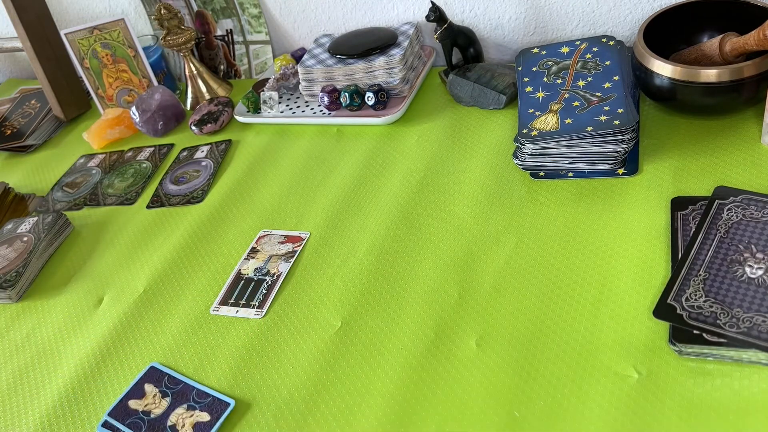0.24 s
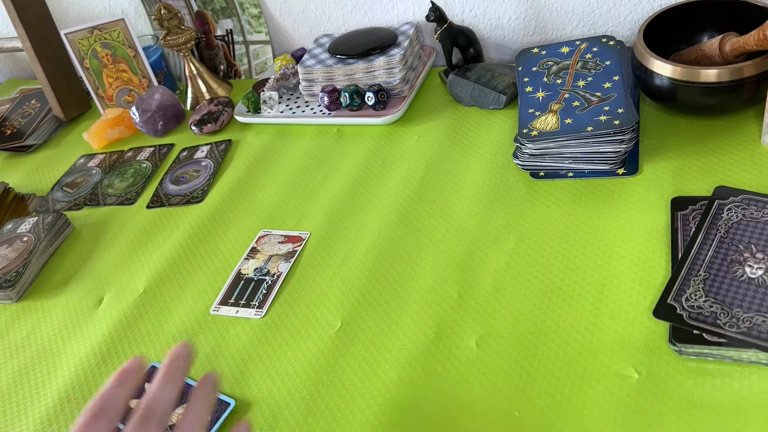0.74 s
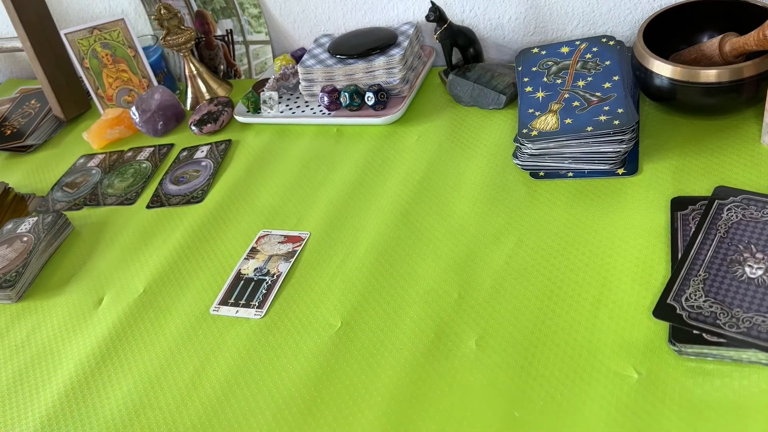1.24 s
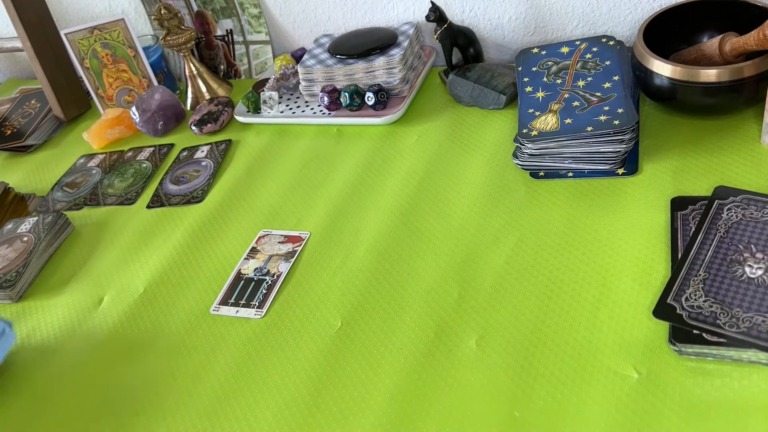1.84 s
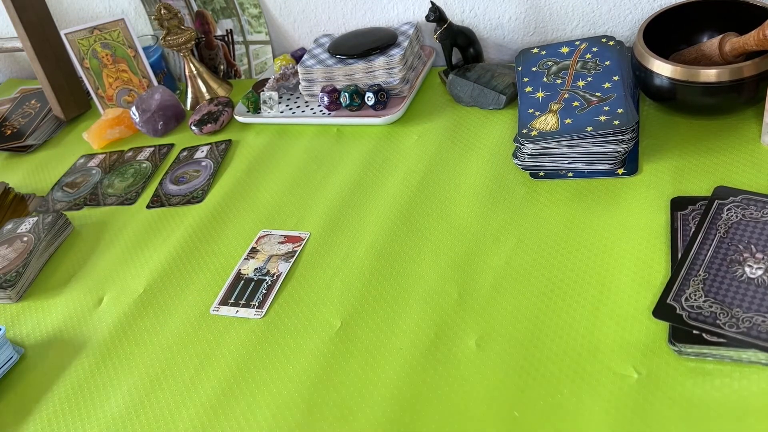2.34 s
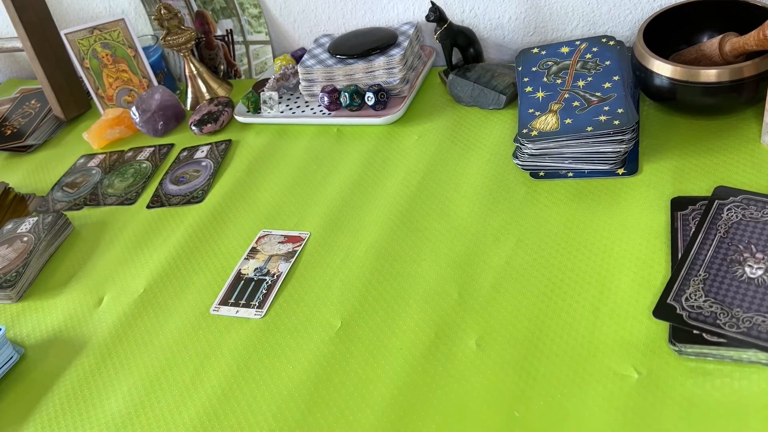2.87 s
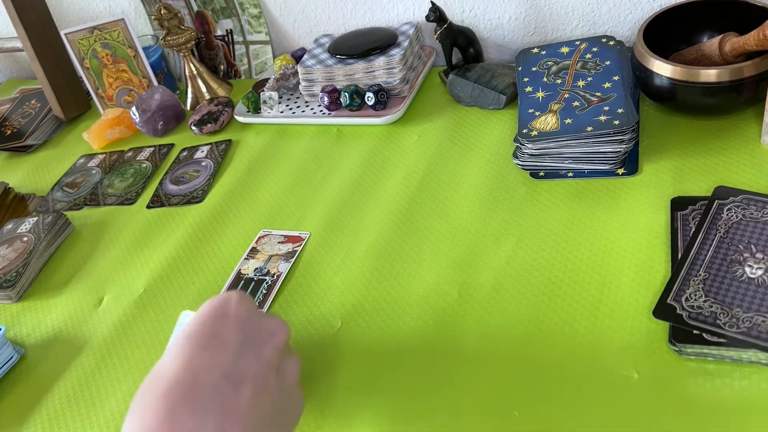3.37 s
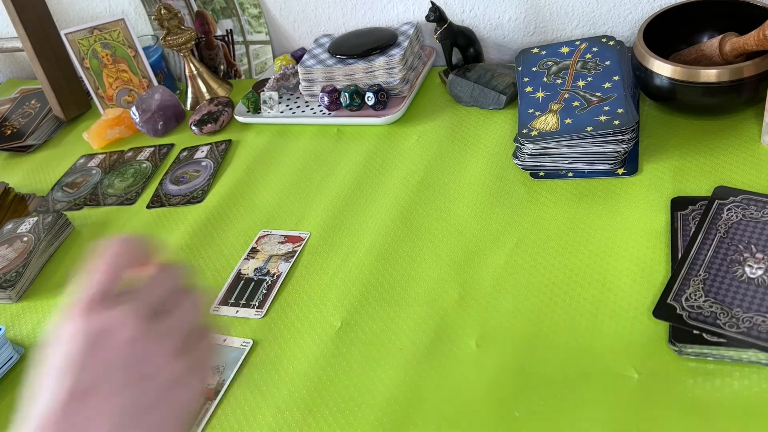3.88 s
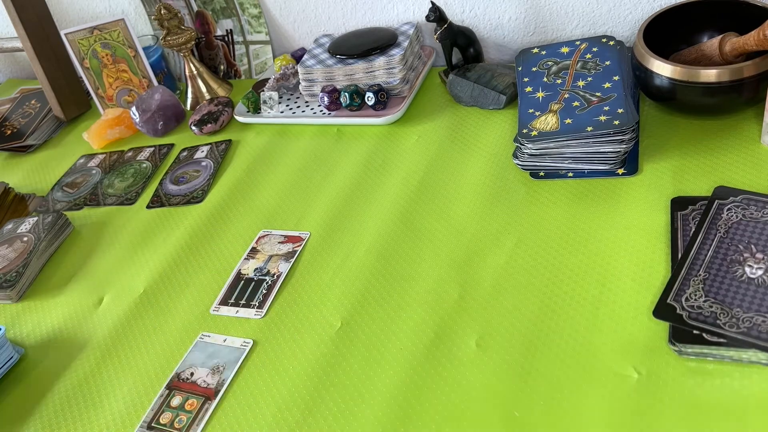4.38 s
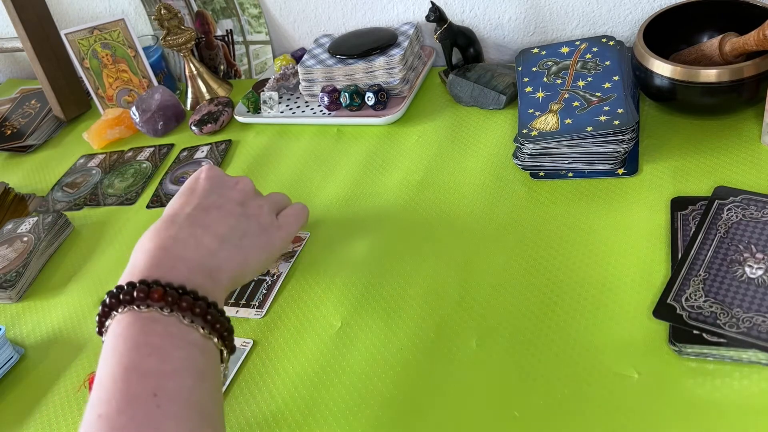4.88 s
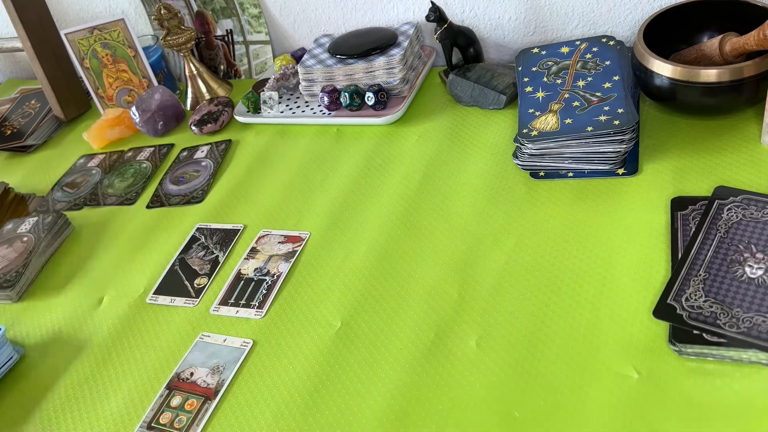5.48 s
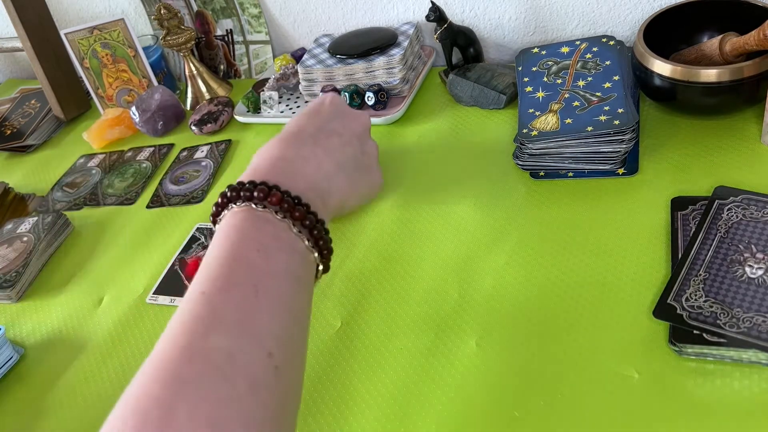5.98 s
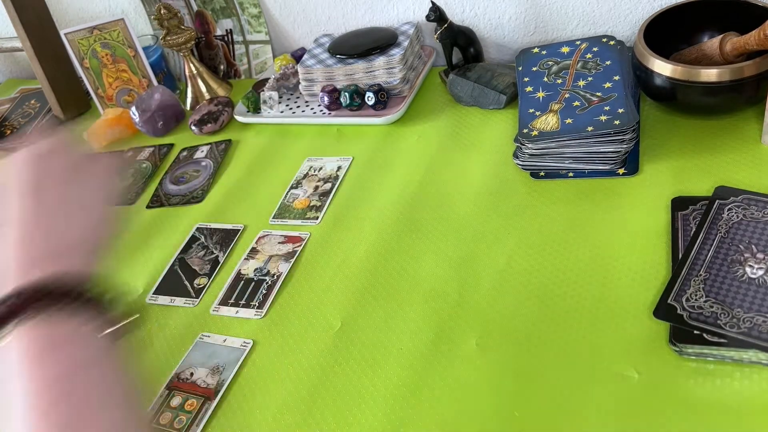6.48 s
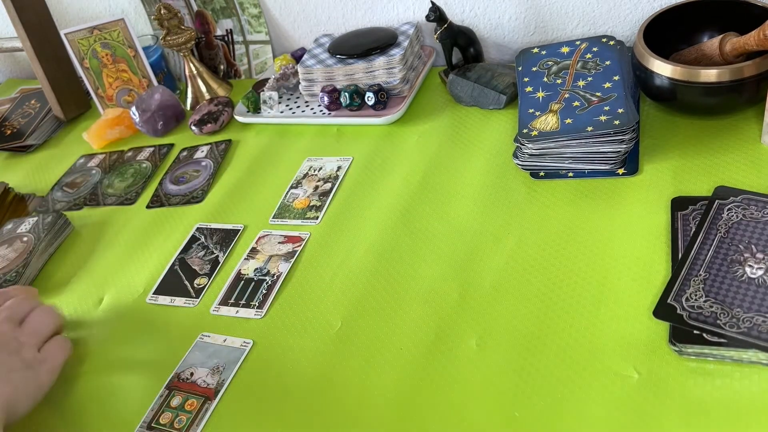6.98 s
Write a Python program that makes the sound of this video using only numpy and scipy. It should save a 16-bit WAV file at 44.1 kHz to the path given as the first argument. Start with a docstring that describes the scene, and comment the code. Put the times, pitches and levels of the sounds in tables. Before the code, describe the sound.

Stiff cards snap and tap onto a thin mat over a wooden table, with papery rubs between, over a faint low hum.

```python
"""Stiff cards on a thin mat

Small stiff cards are squared, slid off a deck and snapped down on a thin mat over a wooden table, close up.
Each contact is a burst of uneven clicks that rings the card, crackles at its edge and knocks the table modes.
Between contacts, shaped noise rubs, scuffs, whistles and drags in strokes; dense reflections trail the
contacts and drags. Soft noise and hum lie underneath, and the recorder's gain sinks after loud snaps."""
import sys
import numpy as np
from scipy import signal
from scipy.fft import rfft, irfft, next_fast_len
from scipy.io import wavfile
from scipy.ndimage import uniform_filter1d

SR = 44100
rng = np.random.default_rng(int(sys.argv[2]) if len(sys.argv) > 2 else 0)


def to_wav(s):
    """Save 16-bit WAV."""
    ch = np.atleast_2d(s).T  # columns
    pcm = np.round(np.clip(ch, -1, 1) * 32767)  # PCM
    wavfile.write(sys.argv[1], SR, pcm.astype(np.int16))


N = 318402

# All levels are ahead of the recorder's gain control.
# Soft room noise. Each row: frequency in Hz, relative density in dB per Hz.
ROOM_TONE_SPECTRUM = [(25, -23), (50, 3.5), (160, -1), (430, -6.5), (620, -14), (800, -13), (1370, -18.5),
                      (1800, -13.5), (2500, -20), (3600, -23.5), (4600, -36.5), (9900, -40.5), (11600, -34),
                      (16000, -49)]
ROOM_TONE_DB = -56
# Wavering hum lines. Each row: frequency in Hz, width of each filter pass in Hz, level in dB.
HUM_LINES = [(76.5, 19, -69), (114.2, 41, -61.5), (158.75, 4.4, -62), (223.8, 4, -72)]
STEADY_HZ, STEADY_DB = 159.1, -59.5   # the steadier core of the hum

# Card contacts. Each row: start in seconds, peak of the card's ring and slap in dB, card ring in Hz,
# edge crackle in dB re that peak, knock into the table in dB re that peak, frequency that the knock
# favours in Hz, contact length in seconds.
CARD_TAPS = [(0.01, -45.5, 3200, -2, -15, 700, 0.0027), (.023, -32, 2880, -20, -2, 700, 0.0072),
             (0.035, -35.5, 2800, -24, 10, 206, 0.0038), (0.13, -20, 2700, -7.5, -2, 900, 0.0034),
             (0.1336, -20, 4970, -19, 6.5, 910, 0.0026), (.138, -24.5, 4200, -10, 8, 1200, 0.0034),
             (0.184, -34, 3800, -7, -8, 690, 0.0027), (0.194, -35, 4530, -8, 9, 302, 0.0035),
             (0.399, -52.5, 5020, 3, -5, 390, 0.0018), (0.443, -41.5, 1120, -0.5, 2, 397, 0.0053),
             (0.542, -40.5, 2650, -11, 1, 357, 0.0084), (0.92, -41.5, 5000, -3, -15, 1290, 0.0023),
             (0.943, -60, 9050, 2, -13, 780, 0.0015), (1.354, -43, 6000, -12, 5, 406, 0.0026),
             (1.499, -45, 3214, -3, 1, 1070, 0.0042), (1.552, -53, 5120, 10, -8, 750, 0.004),
             (1.654, -40, 1130, 2.5, 13.5, 1110, .0042), (1.797, -47, 1410, 1, 24.5, 880, 0.0019),
             (1.799, -23.5, 3640, -1.5, -7, 268, 0.0026), (1.809, -38, 3280, -19, 0, 460, 0.0043),
             (1.895, -37.5, 4150, -6, 2, 430, 0.013), (2.001, -32, 1440, -8, 1.5, 140, 0.0019),
             (2.003, -35, 3600, -8, -6, 302, 0.0045), (2.009, -41, 900, -10, 9, 400, 0.0032),
             (2.026, -40, 2800, -1, 7, 700, 0.0048), (2.017, -38, 3370, 0, 10, 700, 0.00406),
             (2.055, -33, 3600, -0.5, -11, 312, 0.0077), (2.068, -32, 1680, -15, -7, 700, 0.0042),
             (2.063, -26.5, 4440, -2, -12, 316, 0.0056), (2.182, -57, 6030, 10, -9, 395, 0.0022),
             (2.378, -31.5, 3200, -3.5, -11, 760, 0.0045), (2.392, -31.5, 2840, -18, -11, 780, 0.0017),
             (2.631, -39, 3820, 3, -6, 316, 0.018), (2.741, -28.5, 7800, -10, -17, 365, 0.016),
             (3.119, -45, 3500, -9, -17, 420, 0.004), (3.139, -45.5, 1610, -15, -8, 424, 0.005),
             (3.147, -39.5, 2770, -12, -16, 420, 0.0024), (3.304, -48, 2470, -27, -20, 420, 0.0075),
             (3.368, -38.5, 2460, -1, 5.5, 900, 0.0024), (3.5197, -38, 6300, -21, 12.5, 390, 0.0023),
             (3.665, -43.5, 3150, -7, 4, 220, 0.0037), (3.7755, -26.5, 4440, -8, -17, 700, 0.0034),
             (3.799, -30, 3530, 1.5, 15, 398, 0.0036), (3.9048, -39, 7300, 13, -8, 205, 0.0019),
             (3.912, -53, 5380, 13, -12, 230, 0.0029), (4.134, -38.5, 1180, -0.5, -23, 200, 0.00094),
             (4.1642, -34, 4000, -8, 6, 1300, 0.0015), (4.28, -48, 3000, 1, -14, 400, .005),
             (4.315, -43, 2820, -16, -9, 945, 0.006), (4.335, -44, 3420, -17, -3, 288, 0.0052),
             (4.609, -43, 3020, 8.5, -18, 270, 0.0015), (4.61, -30, 11400, -15, -25, 400, 0.0023),
             (4.624, -43, 4500, 3, -20, 380, 0.0013), (4.6288, -40, 4400, 12, -20, 380, 0.0017),
             (4.629, -34, 11500, -10, -25, 400, 0.0017), (4.637, -43, 3100, 11, 10, 376, 0.0017),
             (4.6811, -31, 3260, -8, -1, 704, 0.0026), (4.685, -32.5, 2900, -9.5, 4, 670, 0.004),
             (4.694, -40, 2000, -10, 9, 700, 0.00404), (4.718, -40, 2500, -10, 17, 416, 0.0011),
             (4.729, -43, 2760, -15, 8, 324, 0.0033), (4.754, -49, 3500, -6, -3, 400, 0.0022),
             (4.7916, -47.5, 3230, 7, -20, 250, 0.0017), (4.9752, -44, 5300, 9, -17, 370, 0.0015),
             (5.007, -44, 4000, -3, -14, 400, 0.0018), (5.052, -44, 2000, -9, 12, 397, 0.0018),
             (5.076, -28, 3940, -4, -16, 395, 0.0023), (5.087, -37, 4000, -24, -6, 407, 0.0014),
             (5.1058, -17.5, 3480, 0.5, -18, 366, 0.0022), (5.118, -28, 4260, -13, 8, 407, 0.0042),
             (5.151, -42, 4800, -15, -7, 397, 0.0017), (5.197, -50, 4330, 9, -14, 338, 0.0019),
             (5.222, -50, 7000, 5, -9, 204, 0.0015), (5.484, -34.5, 3370, -3.5, -21, 198, 0.0027),
             (5.545, -35, 2700, -14, -19, 200, 0.0027), (5.5534, -38.5, 4630, -13, -3, 232, 0.0056),
             (5.625, -33, 4500, -7, 11.5, 1100, 0.0098), (5.854, -41.5, 5830, 18, -27, 333, 0.00089),
             (5.856, -29.5, 11500, -18, -28, 400, 0.0028), (5.861, -44, 6050, 14.5, -14, 790, 0.002),
             (5.9915, -29.5, 2900, -0.5, -27, 197, 0.0015), (6.052, -44.5, 4140, -24, 14, 325, 0.0032),
             (6.196, -52, 5940, -12, -2, 700, 0.0021), (6.228, -31, 5500, -22, -15, 400, 0.0035),
             (6.24, -41, 4500, -10, -15, 400, 0.002), (6.253, -35.5, 5000, -11, -21, 400, 0.0027),
             (6.269, -35, 2500, -3, 8, 398, 0.0021), (6.299, -26, 1450, -2, 2.5, 740, 0.0012),
             (6.405, -46.5, 7440, 7.5, -8, 715, 0.0016), (6.756, -46.5, 1900, -23, 5, 1050, 0.012),
             (6.822, -43.5, 4120, 6.5, 0, 395, 0.0025), (6.838, -36, 1910, -14, 6, 740, 0.0028),
             (6.86, -38, 1860, -6.5, -2, 420, 0.0053), (6.881, -46, 3000, -9, -3, 400, 0.0018),
             (6.914, -44, 1800, -6, 1, 700, 0.006), (6.957, -36.5, 1490, -5, 14.5, 690, 0.0025),
             (6.962, -33.5, 2520, -2, -4, 696, 0.0043), (6.975, -31.5, 3270, -16, 6, 720, 0.0015),
             (6.989, -34, 1300, -19, 7, 695, 0.0029), (6.996, -36, 3000, -8, -4, 700, 0.0014),
             (7.009, -28.5, 1450, -19, -13, 950, 0.0038), (7.018, -38, 1400, -10, -5, 1000, 0.0019),
             (7.032, -32, 1210, -12, 0, 1010, 0.0017), (7.046, -20.5, 2000, -14, 8.5, 1030, 0.001),
             (7.05, -36, 1790, 1, -5, 1000, 0.0023), (7.068, -49, 2500, -5, -5, 700, 0.0015),
             (7.114, -46, 3500, -3, -5, 700, .002), (7.097, -48, 3500, -3, -3, 500, 0.0025),
             (7.114, -36.5, 1060, -10, 17, 392, 0.0016), (7.162, -26.5, 3040, -7, 14, 1330, 0.00255),
             (7.17, -37, 2980, -6, 13.5, 189, 0.001), (7.185, -34, 1600, -12, -3, 400, 0.0027),
             (7.197, -34.5, 1500, -10, -1, 400, 0.0025)]
# Loud snaps, where the sound flutters between card and table. Each row: start in seconds, peak of the
# card's ring and slap in dB, card ring in Hz, edge crackle in dB re that peak, knock in dB re that peak,
# frequency that the knock favours in Hz, contact length in seconds, spacing of the flutter's rings in Hz.
CARD_SNAPS = [(0.0311, -8, 2310, -4.5, -9, 760, 0.00062, 745),
              (.0334, -8, 2860, -31.5, 4, 735, 0.00077, 945),
              (3.7788, -16, 4960, -10.5, -0.5, 710, 0.00067, 707),
              (5.0786, -16.5, 3980, -11, -2, 395, 0.00075, 2060),
              (5.079, -19, 6100, -23, -5, 395, 0.0011, 2040),
              (5.1071, -14, 4830, -20.5, 2.5, 367, 0.0018, 2110),
              (6.2964, -16, 4820, -7, -2, 437, 0.0012, 2590)]
SLAP_DB, SLAP_FOLLOWS = -0.5, 0.63   # broad slap under the card's ring; grows with the crackle, dB per dB
TAP_SLAP_SPAN, SNAP_SLAP_SPAN = 5.1, 2.2   # the slap reaches down to the card's ring over this
SNAP_FIRST = 2.2   # a snap's first click over its largest other click
FLUTTER_KEEPS = 0.81   # share left after the bounce
# Modes of the table top. Each row: frequency in Hz, width in Hz, gain in dB.
TABLE_MODES = [(166.5, 32, -5.5), (220, 74, -9.5), (398, 24.6, -8), (561, 54, -16.5), (710, 37, -4.5),
               (892, 154, -14.5), (1000, 45, -13), (1313, 28, -26)]

ROOM_T60_S, ROOM_CUT_HZ, ROOM_DB = 0.36, 1300, -12   # decay below the cut, split to treble, level
ROOM_BUILD_S = 0.012   # reflections take this long to gather

# Strokes of cards and fingers rubbing. Each row: crest in seconds, body in dB, sizzle in dB,
# swell in seconds, fade in seconds.
RUB_STROKES = [(.06, -46.5, -74, 0.039, 0.099), (.152, -44.5, -55, 0.021, 0.13),
               (0.406, -74, -78, 0.024, 0.053), (0.485, -55, -49, 0.14, 0.17),
               (.58, -66, -60.5, 0.088, 0.085), (.72, -70, -68, 0.46, 0.077),
               (0.929, -74.5, -80, 0.034, 0.21), (1.12, -55.5, -49, 0.35, 1), (1.3, -71, -58, 0.3, 0.11),
               (1.39, -74, -65, 0.21, 0.03), (1.552, -65, -56.5, 0.056, 0.32),
               (1.664, -51.5, -55, 0.024, 0.26), (1.806, -65, -49.5, 0.11, 0.047),
               (1.91, -56.5, -55, 0.16, 0.12), (2.013, -48.5, -54, 0.034, 0.084),
               (2.075, -55, -55, 0.041, 0.16), (2.15, -59.5, -75, 0.033, 0.89),
               (2.383, -61, -72, 0.021, 0.35), (2.48, -76, -56, 0.55, 0.95),
               (2.76, -63.5, -48, 0.25, 0.082), (2.86, -74, -60, .06, 0.041),
               (2.975, -62, -63.5, 0.12, 0.35), (3.077, -68, -52.5, 0.084, 0.13),
               (3.145, -62, -58.5, .1, 0.069), (3.29, -66.5, -66.5, 0.3, 0.24),
               (3.528, -55.5, -63, 0.034, 0.077), (3.765, -61, -64, 0.39, 0.03),
               (3.783, -42, -47, 0.016, 0.086), (3.909, -77, -63, 0.036, 0.28),
               (4.151, -69, -62.5, 0.31, 0.27), (4.232, -72, -59, 0.26, 0.11),
               (4.334, -65, -62.5, 0.24, 0.12), (4.468, -85, -64, 0.22, 0.1),
               (4.62, -77, -55.5, 0.026, 0.18), (4.7, -65, -63, 0.024, 0.077), (4.8, -63, -76, 0.23, 0.99),
               (4.991, -63, -67, 0.04, 0.31), (5.105, -54.5, -45, 0.08, 0.18), (5.3, -73, -70, 0.34, 0.1),
               (5.552, -66, -56, 0.15, 0.23), (5.635, -54, -68, 0.15, 0.08), (5.731, -66, -62, 0.14, 0.39),
               (5.862, -74, -54, 0.043, 0.16), (6.012, -58.5, -64, 0.059, 0.26),
               (6.215, -58, -59, 0.23, 0.083), (6.308, -50.5, -50.5, 0.16, 0.091),
               (6.419, -74, -66, 0.12, 0.11), (6.617, -64.5, -70, 0.033, 0.81),
               (6.761, -62, -66.5, 0.34, 0.094), (6.846, -61, -59, 0.061, 0.23),
               (6.975, -49, -56, 0.12, 0.67), (7.172, -46.5, -49.5, 0.052, 0.22)]
# Body of the rub, before it is made patchy. Each row: frequency in Hz, relative density in dB per Hz.
RUB_BODY_SPECTRUM = [(350, 2), (700, 3), (1100, 3.5), (1500, 3.5), (2100, 1.5), (4500, -1.5), (6500, -8.5),
                     (9000, -21)]
# Sizzle of the rub. Each row: frequency in Hz, relative density in dB per Hz.
RUB_SIZZLE_SPECTRUM = [(4000, -4.5), (6500, -3.5), (8500, -6), (10200, -11.5), (11600, -1.5), (14500, -9),
                       (15700, -9), (16300, -29)]
# Cards scuff the mat with a papery fizz as they are pulled away, lowered or pressed flat. Each row:
# crest in seconds, level in dB, swell in seconds, fade in seconds, frequency in Hz, filter width in Hz.
MAT_SCUFFS = [(.055, -48.5, 0.022, 0.24, 2630, 1770), (1.14, -46.5, 0.17, 0.31, 3600, 4540),
              (3.81, -54.5, 0.051, 0.14, 5170, 2000), (4.69, -52, 0.011, 0.076, 2960, 2000),
              (5.125, -48.5, 0.027, 0.15, 4300, 1610), (6.19, -58, 0.045, 0.091, 6030, 2000),
              (6.31, -51.5, .01, 0.13, 4800, 1800)]
# A card edge sings faintly as it slides. Each row: crest in seconds, level in dB, swell in seconds,
# fade in seconds, frequency in Hz, filter width in Hz.
EDGE_WHISTLES = [(1.1, -51, 0.091, 0.16, 1820, 255), (1.105, -51, 0.068, .06, 2880, 293),
                 (1.17, -57, 0.063, 0.13, 1080, 200), (1.22, -52.5, 0.15, 0.13, 2480, 600),
                 (1.27, -58.5, 0.19, 0.037, 1100, 200), (2.15, -60.5, 0.18, 0.86, 2030, 398),
                 (2.474, -47.5, 0.078, 0.1, 3250, 1160), (2.56, -59.5, 0.14, 0.52, 3580, 1000),
                 (4.29, -64, 0.031, .06, 1800, 300), (6.198, -56.5, 0.016, 0.014, 5930, 413)]
STROKE_RANGE_DB = 20   # swell and fade times span this much at steepness 1
STROKE_BEND, SIZZLE_STEEPNESS = 0.96, 1.86   # roundness of a crest; sizzle comes and goes faster than body

# Hand and deck dragged over the table. Each row: crest in seconds, level in dB, swell in seconds,
# fade in seconds.
TABLE_DRAGS = [(6.218, -47, 0.1, 0.019), (6.864, -48.5, 0.059, 0.35), (6.97, -47, 0.066, 0.066),
               (7.12, -42.5, 0.025, 0.39), (7.15, -40, 0.1, 0.39)]

CUTOFF_HZ = 16800   # the top is gone from here up


def from_db(db):
    """Decibels to gain."""
    return 10 ** (np.asarray(db) / 20)


def rms_one(x):
    """Scale to rms 1."""
    return x / np.sqrt(np.mean(x ** 2) + 1e-20)


def drift(rate_hz):
    """Slow chance of spread 1: noise at every 40th sample, twice low-passed."""
    step, settle = 40, 2000   # samples per point, points thrown away
    r = np.exp(-2 * np.pi * rate_hz * step / SR)
    white = rng.standard_normal(N // step + settle + 2)
    slow = signal.lfilter([1], [1, -2 * r, r * r], white)[settle:]
    return np.interp(np.arange(N) / step, np.arange(len(slow)), rms_one(slow))


def resonance(x, hz, width_hz):
    """Two-pole peak, gain 1 on top."""
    r = np.exp(-np.pi * width_hz / SR)
    zeros = np.array([1, 0, -1]) * (1 - r * r) / 2
    poles = [1, -2 * r * np.cos(2 * np.pi * hz / SR), r * r]
    return signal.lfilter(zeros, poles, x)


def narrow(x, hz, width_hz):
    """A resonance applied twice, for steep skirts; rms 1."""
    return rms_one(resonance(resonance(x, hz, width_hz), hz, width_hz))


def band(x, low_hz, high_hz):
    """Gentle band-pass."""
    sos = signal.butter(2, [low_hz, high_hz], "band", fs=SR, output="sos")
    return signal.sosfilt(sos, x)


def coloured(white, spectrum):
    """Noise shaped to a spectrum drawn on a log-frequency axis; rms 1."""
    hz, level_db = np.transpose(spectrum)
    size = next_fast_len(N)
    bins = np.arange(1, size // 2 + 2) * SR / size
    gain = from_db(np.interp(np.log(bins), np.log(hz), level_db))
    return rms_one(irfft(rfft(white, size) * gain, size)[:N])


def strokes(rows, steepness=1.0):
    """Gain of overlapping strokes: each swells to its crest and fades; powers add."""
    t, power = np.arange(N) / SR, np.zeros(N)
    for crest_s, db, swell_s, fade_s in rows:
        away = np.maximum((crest_s - t) / swell_s, (t - crest_s) / fade_s)
        near = away < 4
        fall_db = STROKE_RANGE_DB * steepness * away[near] ** STROKE_BEND
        power[near] += from_db(db - fall_db) ** 2
    return np.sqrt(power)


def room_tone():
    """Soft broad noise with a few wavering hum lines, and one steadier tone whose pitch wanders slightly."""
    lines = sum(from_db(db) * narrow(rng.standard_normal(N), hz, width) for hz, width, db in HUM_LINES)
    steady_hz = STEADY_HZ + 0.59 * drift(2.56)
    steady = np.sqrt(2) * np.sin(2 * np.pi * np.cumsum(steady_hz) / SR)
    air = coloured(rng.standard_normal(N), ROOM_TONE_SPECTRUM)
    return lines + from_db(STEADY_DB) * steady + from_db(ROOM_TONE_DB) * air


def table(force):
    """The table top rings in its modes."""
    return sum(from_db(db) * resonance(force, hz, width) for hz, width, db in TABLE_MODES)


def flutter(clicks, t, ring_hz):
    """A snap: one hard first click, then a single bounce off the table that combs the sound."""
    clicks = clicks + SNAP_FIRST * np.abs(clicks).max() * (t == 0)
    return clicks + FLUTTER_KEEPS * np.interp(t - 1 / ring_hz, t, clicks, left=0)


def taps(sharpness=4.4):
    """A contact is a burst of uneven clicks: they ring the card and crackle at its edge; a push knocks the table."""
    air, force = np.zeros(N), np.zeros(N)
    t = np.arange(2048) / SR
    for s, db, hz, crackle_db, knock_db, knock_hz, length_s, *spacing_hz in CARD_TAPS + CARD_SNAPS:
        phase = t / length_s
        press = np.minimum(1.1 * phase, 1) * np.exp(-phase ** 1.02)   # quick rise, short end
        unevenness = from_db(6.55 * rng.standard_normal(len(t)))
        clicks = press * rng.standard_normal(len(t)) * unevenness
        for ring_hz in spacing_hz:   # only snaps have one
            clicks = flutter(clicks, t, ring_hz)

        # one main ring on a broad slap
        span = SNAP_SLAP_SPAN if spacing_hz else TAP_SLAP_SPAN
        slap = band(clicks, hz / span, hz * 1.64)
        slap_gain = from_db(SLAP_DB + SLAP_FOLLOWS * crackle_db)
        card = resonance(slap, hz, hz / sharpness) + slap_gain * slap
        crackle = band(clicks, 3000, 14500)
        sound = card / np.abs(card).max() + from_db(crackle_db) * crackle / np.abs(crackle).max()

        # one push as the card comes to rest; where it lands picks the modes
        push = np.roll(t == 0, round(length_s * SR)) * 1.0
        knock = narrow(push, knock_hz, knock_hz / 1.6)
        knock = knock / np.abs(knock).max()

        at = round(s * SR)
        n = min(len(t), N - at)
        air[at:at + n] += from_db(db) * sound[:n]
        force[at:at + n] += from_db(db + knock_db) * knock[:n]
    return air + table(force)


def room(x):
    """Dense reflections: noise that gathers and dies away, the treble twice as fast."""
    t = np.arange(SR // 2) / SR
    noise = rng.standard_normal(len(t)) * np.minimum(t / ROOM_BUILD_S, 1)
    dull = signal.sosfilt(signal.butter(1, ROOM_CUT_HZ, fs=SR, output="sos"), noise)
    treble = noise - dull
    fall = from_db(-60 * t / ROOM_T60_S)
    tail = dull * fall + treble * fall ** 2
    return signal.fftconvolve(x, tail / np.sqrt(np.sum(tail ** 2)))[:N]


def patchy(x, low_hz, high_hz, patchy_db, rate_hz):
    """Many loose resonances that come and go on their own tint the noise; rms 1."""
    rings = np.zeros(N)
    for k, hz in enumerate(np.geomspace(low_hz, high_hz, num=14)):
        sign = (-1) ** k   # neighbours in opposite polarity
        rings += sign * from_db(patchy_db * drift(rate_hz)) * resonance(x, hz, hz / 5)
    return rms_one(x + 0.45 * rings)


def pitched(rows, noise):
    """Strokes that each favour a band of their own."""
    return sum(strokes([row[:4]]) * narrow(noise, *row[4:]) for row in rows)


def rubbing():
    """Dense tiny slips of card on card and on the ribbed mat; a few larger grains catch among them."""
    rows = np.array(RUB_STROKES)
    grains = (rng.random(N) < 60 / SR) * rng.exponential(0.35, size=N)   # about 60 a second
    catches = signal.lfilter([1], [1, -0.97], grains)   # each dies away within a few ms
    roughness = rms_one(from_db(1.6 * drift(120)) + catches)
    slips = rng.standard_normal((4, N)) * roughness

    body_noise = patchy(coloured(slips[0], RUB_BODY_SPECTRUM), 800, 7500, patchy_db=3, rate_hz=25)
    body = strokes(np.delete(rows, 2, axis=1)) * body_noise   # without the sizzle column
    sizzle_gain = strokes(np.delete(rows, 1, axis=1), SIZZLE_STEEPNESS)   # without the body column
    sizzle = sizzle_gain * coloured(slips[1], RUB_SIZZLE_SPECTRUM)
    scuff = pitched(MAT_SCUFFS, slips[3])
    whistle = pitched(EDGE_WHISTLES, slips[2])
    return body + sizzle + scuff + whistle


def dragging():
    """Dull friction under an even pressure keeps the table top ringing."""
    friction = rng.standard_normal(N) * from_db(2.9 * drift(79))
    ringing = table(resonance(friction, 372, 115))
    loudness = np.sqrt(uniform_filter1d(ringing ** 2, size=1000) + 1e-12)
    return strokes(TABLE_DRAGS) * ringing / loudness   # evened out, so the strokes set the level


def scene():
    """Everything at the one microphone."""
    tone = room_tone()
    near = taps() + dragging()
    return (tone + near + from_db(ROOM_DB) * room(near) + rubbing())[None]


def record(dry):
    """Gain control that sags after loud moments and creeps back, then rumble and top are cut."""
    knee_db, share = -43.5, 0.56   # level where the gain starts to sink, dB of cut per dB above it
    back_db_per_s, lag_s = 62.5, 0.43   # fall of the held level, lag of the gain both ways
    level_db = 10 * np.log10(uniform_filter1d(dry[0] ** 2, size=441) + 1e-12)   # over 10 ms
    climb = back_db_per_s * np.arange(N) / SR
    held_db = np.maximum.accumulate(level_db + climb) - climb   # peaks held, sinking at a set speed
    r = np.exp(-1 / (lag_s * SR))
    cut_db = signal.lfilter([1 - r], [1, -r], share * np.maximum(held_db - knee_db, 0))
    no_rumble = signal.sosfilt(signal.butter(4, 42, "high", fs=SR, output="sos"), dry)
    top_cut = signal.cheby2(12, 60, CUTOFF_HZ, fs=SR, output="sos")
    return signal.sosfilt(top_cut, no_rumble * from_db(-cut_db))


dry = scene()
out = record(dry)
to_wav(out)
```